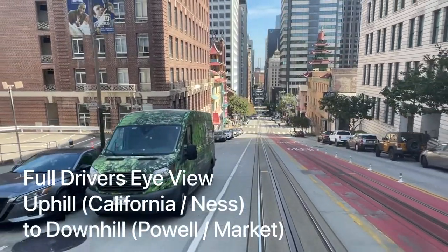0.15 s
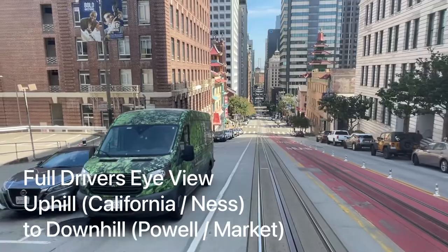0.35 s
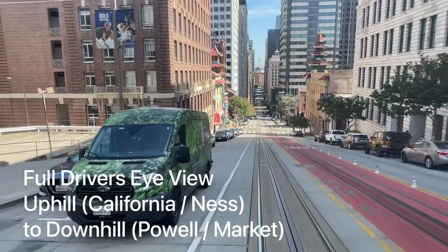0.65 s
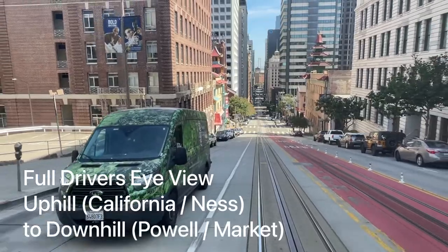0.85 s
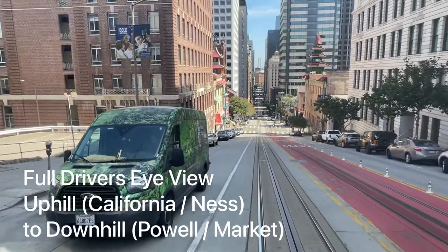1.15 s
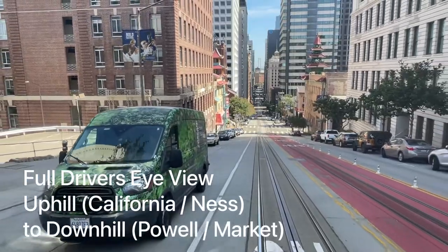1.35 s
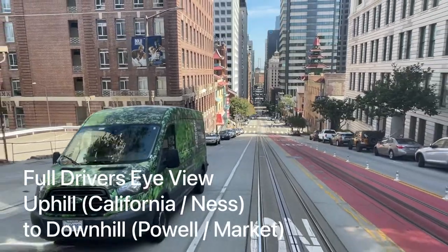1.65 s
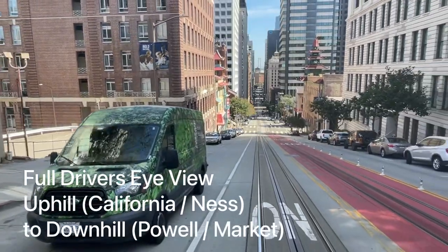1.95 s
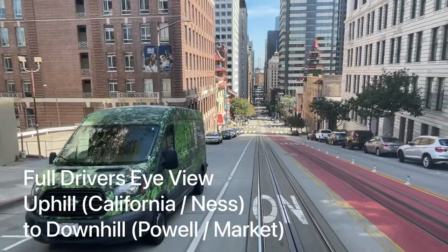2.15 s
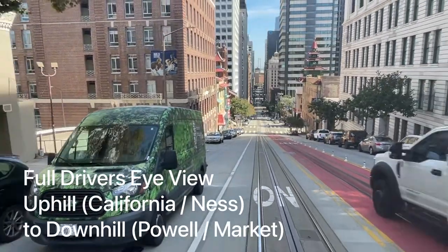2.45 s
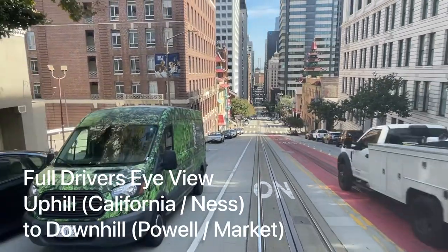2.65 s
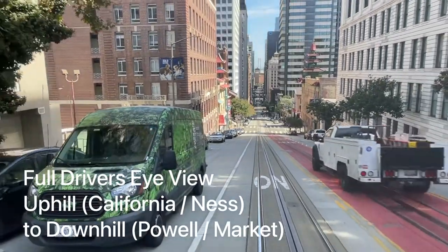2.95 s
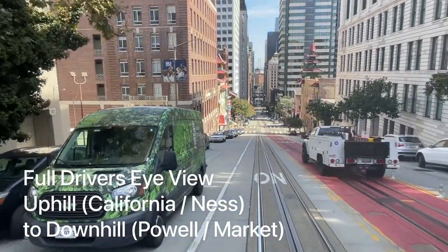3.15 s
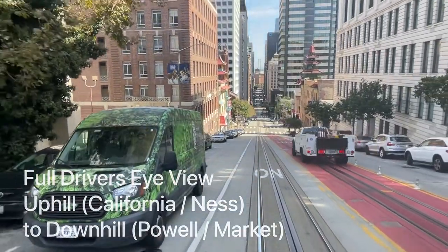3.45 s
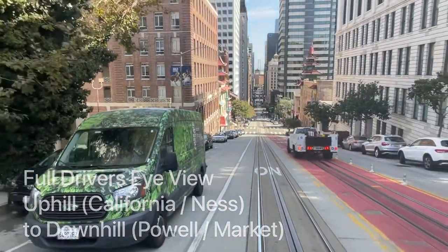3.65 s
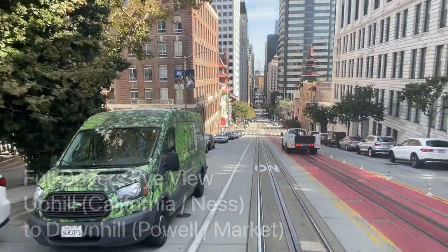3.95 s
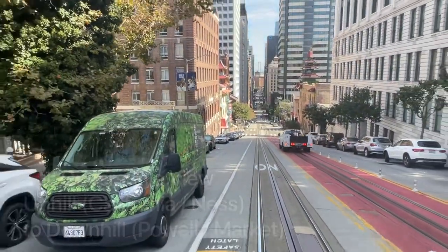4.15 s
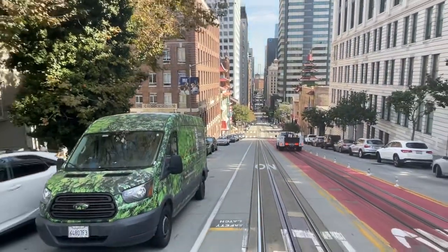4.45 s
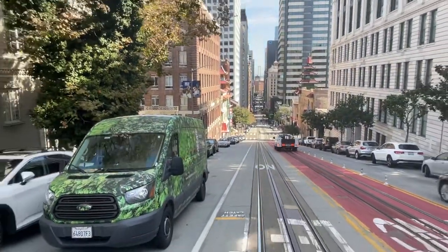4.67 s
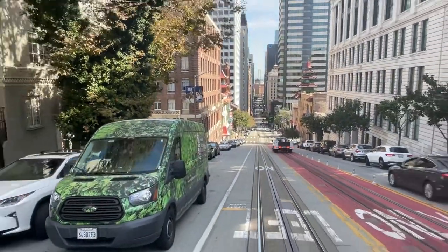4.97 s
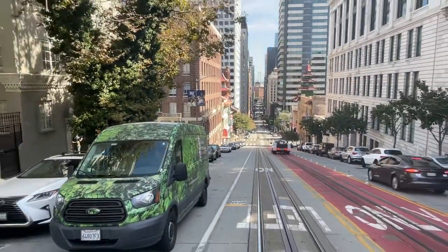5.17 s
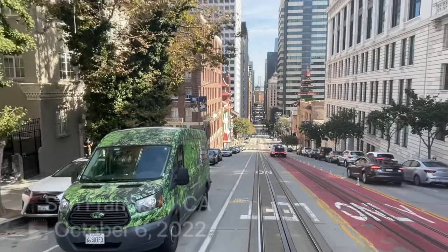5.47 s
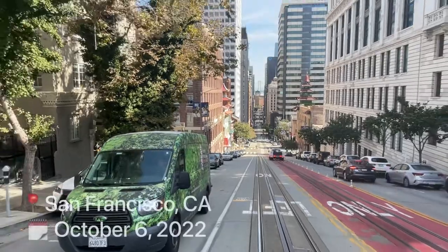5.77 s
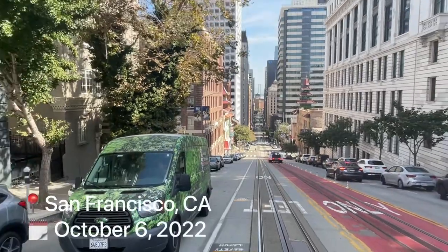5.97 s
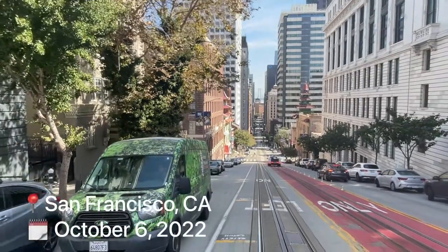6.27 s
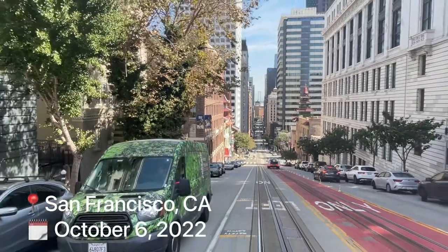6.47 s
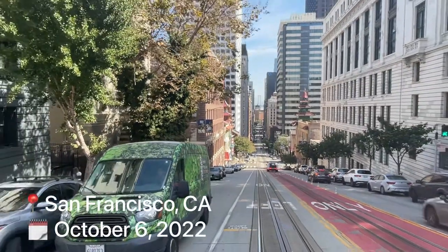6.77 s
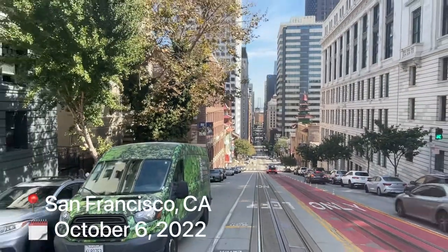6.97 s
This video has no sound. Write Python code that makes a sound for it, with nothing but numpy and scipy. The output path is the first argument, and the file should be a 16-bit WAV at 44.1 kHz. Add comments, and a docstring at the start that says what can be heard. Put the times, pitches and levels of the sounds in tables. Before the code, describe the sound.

Loud low droning and gritty steel rolling from a cable car, with jolts, paired metal clanks, a passing pickup, and a sinking pitch as it brakes.

```python
"""A cable car rolls down a city street, heard from its front platform through two spaced microphones.
Resonances excited by rippled rails make the wheels hum and drone; the drone sinks as the car slows.
Filtered noise gives the wooden body's rumble, the gritty roll and the rattle of loose fittings.
Bursts of small contacts ring the steel in pairs of clanks at the track joints; a brake shoe rubs, chirps
and sings faintly, and a pickup overtakes with a rising sine boom and a hiss of tyre noise."""
import sys
import numpy as np
from scipy import signal
from scipy.fft import rfft, irfft
from scipy.io import wavfile
from scipy.ndimage import uniform_filter1d

SR = 44100
rng = np.random.default_rng(int(sys.argv[2]) if len(sys.argv) > 2 else 0)


def wav_out(sig):
    """Save sig, one row per channel (or a flat mono array), as 16-bit PCM at SR to the path in sys.argv[1]."""
    wavfile.write(sys.argv[1], SR, np.round(np.clip(np.atleast_2d(sig).T, -1, 1) * 32767).astype(np.int16))


N = 313992
TIME = np.arange(N) / SR
BIN_HZ = np.maximum(np.fft.rfftfreq(N, 1 / SR), 1)

# Event levels are relative within a table wherever the layer adds its own gain.
# Car speed through cruise and braking: time_s, speed_share (of cruising speed)
SPEED_CURVE = [(0, 1.032), (2.2, 1.018), (3.6, 1.004), (4.2, 1.056), (5.2, 1.047), (5.5, 0.89), (5.9, .89),
               (6.2, 0.88), (7.12, 0.77)]
# Unevenness of the rail under the wheels: time_s, roughness_db
RAIL_ROUGHNESS = [(0, -1.5), (.66, 1.5), (.95, -2), (1.4, 0), (1.65, -0.5), (2.15, -1.5), (2.5, 0),
                  (2.9, -1.5), (3.3, 0), (3.95, -1.5), (4.25, -4), (4.62, -4.5), (5.17, -8), (5.42, -1),
                  (5.95, 1.5), (6.35, -1.5), (6.85, 0), (7.12, -2.5)]
# How each layer follows speed and rail:
# cruise_db, change_db (per tenth of cruising speed lost), sensitivity (dB per dB of roughness)
DRONE_LEVEL_LAW = (-20, -5, 1.0)
BOOM_LEVEL_LAW = (-28.5, -3.1, 1.5)
RUMBLE_LEVEL_LAW = (-28, -2, 0.9)
ROAR_LEVEL_LAW = (-24, -5, 1.32)
ROLL_LEVEL_LAW = (-32, -5.5, 0.63)
RATTLE_LEVEL_LAW = (-50, -4.5, 0.5)

# Surges of wheel hum over patches of rippled rail: time_s, level_db
HUM_SURGES = [(0.0, -15), (0.06, -26), (0.14, -10), (0.34, -16), (0.63, -11.5), (0.83, -24.5), (0.87, -7.5),
              (0.93, -34), (1.01, -14.5), (1.57, -20.5), (1.61, -13), (1.96, -14), (2.02, -32), (2.08, -7),
              (2.6, -27.5), (2.64, -12), (2.7, -51), (2.74, -20), (2.97, -13), (3.01, -23), (3.33, -15),
              (3.39, -41), (3.41, -20), (3.65, -15), (3.67, -26), (3.86, -14.5), (3.96, -22), (4.26, -10.5),
              (4.44, -19.5), (4.62, -10), (4.72, -15.5), (5.19, -15), (5.37, -25.5), (5.85, -29),
              (5.87, -21), (6.43, -42), (6.88, -38), (7.12, -52)]
# Wandering pitch of the body's boom: time_s, pitch_hz
BOOM_PITCH_CURVE = [(5.3, 147), (5.75, 153), (6.08, 166), (6.4, 153.3), (6.72, 139), (6.88, 151.1)]
# Body groan while the brake is on: start_s, level_db, length_s
BRAKE_GROANS = [(5.25, -25.5, 1.62)]
# Jolts that shake the car: start_s, clatter_db (fittings), length_s, thump_db (body)
CAR_JOLTS = [(0.407, 1.5, 0.055, -2.5), (0.787, 2.5, 0.024, 5), (1.028, -2.5, 0.013, -8),
             (1.181, 1, 0.015, -1.5), (1.29, -4, 0.014, -6), (1.526, 0, 0.021, 5), (1.61, -0.5, 0.013, -14),
             (1.81, -2, 0.075, -13.5), (1.886, 2, 0.048, 2), (1.964, 1, 0.031, -6),
             (2.079, -0.5, 0.027, -17), (2.18, 0, 0.055, -22), (2.34, -8, 0.012, -9),
             (3.092, -4.5, 0.11, -23), (3.214, 2, 0.011, -0.5), (3.447, 4.5, 0.03, -20),
             (3.554, 2, 0.089, 2), (3.722, -21, 0.047, -0.5), (3.912, -1.5, 0.066, 0),
             (4.075, -1.5, 0.017, -9), (5.245, -6.5, 0.083, -3), (6.995, -9.5, .033, -27)]
# Blows and scrapes at the track joints:
# start_s, level_db, rise_s, length_s, crack_pitch_hz, crack_db, treble_db
JOINT_CLANKS = [(2.654, -15.5, 0.018, 0.042, 2650, -2.5, 2), (2.722, -1, 0.003, 0.014, 1933, -2, -6),
                (2.833, -12, 0.013, 0.035, 2520, -1, -12), (4.185, -8.5, 0.014, 0.043, 2670, -7.5, -2.5),
                (4.262, -0.5, 0.018, 0.015, 2310, -9, 1), (4.89, -10.5, 0.018, 0.047, 2670, -8, -1),
                (4.976, -1, 0.0093, 0.018, 2200, -8, -1.5)]
# Wheel striking and chattering on the joint: start_s, level_db
WHEEL_STRIKES = [(2.724, -14), (2.734, -12), (2.749, -19), (4.274, -16), (4.294, -16), (4.987, -10.5),
                 (4.998, -18)]
# Hollow knocks of the wooden frame: start_s, level_db, length_s
FRAME_KNOCKS = [(.245, -20, 0.026), (.61, -19, 0.025), (3.97, -25.5, 0.056)]
# Ticks of a loose steel part: start_s, level_db, length_s, tick_db (dry tick against level_db)
TINK_EVENTS = [(0.6, -50, .006, 0), (1.617, -48, 0.0087, 4), (2.345, -47, .008, 4.5), (3.152, -51, .008, 3),
               (4.416, -35, .004, -15)]
# Brake shoe rubbing on the rail: start_s, level_db, length_s
SHOE_RUBS = [(1.19, -37, .035), (1.295, -37.5, 0.034), (3.455, -31.5, 0.019), (5.81, -47.5, 0.26),
             (6.25, -54.5, .55)]
# Brake shoe chirping: start_s, level_db, length_s, pitch_hz (halfway through)
SHOE_CHIRPS = [(2.445, -4, 0.02, 5100), (2.493, 0, 0.023, 5070), (2.565, -1.5, 0.024, 5100),
               (2.6, -5, 0.073, 5140), (2.85, -13, .1, 5090), (3.31, -12, 0.13, 5070),
               (3.465, 9, 0.004, 5020), (3.543, -5, .012, 5060), (6.74, -24, 0.046, 5210)]
# Brake shoe singing faintly: start_s, level_db, length_s
SHOE_SQUEALS = [(5.5, -70, .8), (6.33, -62.5, .3), (6.68, -64, .15), (6.9, -60, .22)]

# Ringing modes of struck steel: pitch_hz, width_hz, level_db
STEEL_MODES = [(515, 48, 1.5), (606, 7.9, -1), (766, 10, -1), (936, 30, 3.5), (1210, 8.2, -2.5),
               (1370, 13, -7), (1581, 19, 3), (1940, 35, 0), (2230, 37, -3), (2540, 27, -1.5),
               (2756, 12, 4.5), (2935, 34, 0), (3210, 23, -6.5), (3700, 25, -13.5), (4137, 25, -9.5),
               (4300, 14, -12), (5830, 14, -15.5), (6460, 90, -18.5), (7700, 3, -10), (8427, 5, -12.5),
               (9636, 10, -11.5), (10776, 9, -12), (11930, 10, -24)]
# Ringing modes of the loose steel part: pitch_hz, width_hz, level_db
LOOSE_PART_MODES = [(6620, 14, -9), (7483, 10, 0.5), (8350, 13, -1), (9700, 20, -5.5)]
# Ringing modes of the rubbing shoe: pitch_hz, width_hz, level_db
SHOE_MODES = [(1380, 53, -4.5), (1590, 70, -6.5), (1810, 27, 5), (2060, 160, -3.5), (2300, 54, -5.5)]

# Filter colours of the noisy layers, relative levels: pitch_hz, level_db
RUMBLE_FILTER = [(18, -50), (30, -21), (42, -9), (56, 0.5), (95, 2), (118, 1), (138, 3.5), (160, 6.5),
                 (180, -4), (230, -10.5), (320, -68.5)]
ROAR_FILTER = [(170, -3), (240, 10), (290, 4.5), (345, 2), (405, 0.5), (460, 1), (520, -6.5), (640, -44),
               (1000, -61.5)]
ROLL_FILTER = [(350, -11), (540, 6), (730, 7.5), (850, 5.5), (970, 6.5), (1120, 0), (1550, 1.5),
               (1900, -1.5), (2230, -4.5), (2400, -9.5), (2800, -13.5), (3200, -21.5), (5000, -32),
               (12000, -75.5)]
RATTLE_FILTER = [(1200, -8), (2400, 10), (3300, 2), (4400, 3), (5500, 0), (6200, 2), (7400, -9),
                 (9600, -12.5), (11000, -23), (12200, -33.5), (13500, -48)]
JOLT_FILTER = [(300, 11.5), (700, 16.5), (1200, 9), (2200, 8), (3200, -3.5), (5400, -9), (6400, -6.5),
               (7500, -16), (9600, -19), (11000, -28), (13500, -43.5)]
TYRE_FILTER = [(400, -14), (1000, 3), (2200, 0.5), (3300, -17), (6500, -18), (11000, -40.5), (13000, -62)]
CLANK_FILTER = [(250, -6), (480, 8), (900, 2), (1400, -0.5), (2300, -1.5), (3000, -5.5), (3350, -8),
                (4600, -13), (5500, -16), (6600, -15), (7600, -19), (9500, -21.5), (11000, -33),
                (12000, -32.5), (13500, -46.5)]
# Stereo width of diffuse noise: pitch_hz, side_db (side minus mid)
STEREO_WIDTH = [(40, -11.5), (120, -13), (260, -5.5), (420, -5.5), (600, 2.5), (800, 0.5), (1200, 1),
                (1500, 0), (2000, -2), (2500, 1.5), (4200, -2), (5400, 3), (6800, -4), (9000, 4.5),
                (11500, -9)]

HUM_HZ, HUM_SPREAD_HZ = 245.9, 11.7
DRONE_HZ = 210.6  # at cruising speed
# The drone takes this share of each hum surge, counted in dB from the hum's moving average.
SURGE_SHARE, SURGE_AVERAGE_S = 0.36, 0.45
KNOCK_HZ = 402.7
CHIRP_GLIDE_HZ_PER_S = 1000
SQUEAL_HZ, SQUEAL_SPLIT_HZ = 3390, 38  # lower of two close shoe modes, and the gap between them
PICKUP_S, PICKUP_LENGTH_S, PICKUP_DB = 2.07, 0.29, -23  # exhaust boom as it draws level
PICKUP_HZ, PICKUP_CLIMB_HZ_PER_S = 74.1, 11
NEAREST_S, HISS_FALL_S, HISS_DB = 2.7, 0.31, -35  # tyres nearest, time to fall 3 dB, peak level
MIC_LAG_S = 0.00046  # travel time of sound between the two microphones
LOW_CUT_HZ, TOP_HZ = 32, 13000


def undb(db):
    """Decibels to gain."""
    return 10 ** (np.asarray(db) / 20)


def unit(x):
    """Scale a stereo pair so that its centre has rms 1."""
    return x / np.sqrt(np.mean(x.mean(0) ** 2))


def curve(table):
    """Join a table's timed points by straight lines."""
    s, values = np.transpose(table)
    return np.interp(TIME, s, values)


def gains(points):
    """Gain at every frequency, in straight lines over log pitch and dB."""
    hz, db = np.transpose(points)
    return undb(np.interp(np.log(BIN_HZ), np.log(hz), db))


def shape(x, response):
    """Filter by a frequency response."""
    return irfft(rfft(x) * response, N)


def walk(rate):
    """Slow chance with spread 1, changing about rate times a second."""
    response = np.exp(-.5 * (BIN_HZ / rate) ** 2)
    response[0] = 0  # no constant offset
    x = shape(rng.standard_normal(N), response)
    return x / x.std()


def diffuse():
    """Noise from all round: the bass much alike in both microphones, the treble less so."""
    mid, side = rng.standard_normal((2, N))
    side = shape(side, gains(STEREO_WIDTH))
    return np.array([mid + side, mid - side])


def sided(near_db):
    """Diffuse noise plus a share from the nearest wheels, which reaches the right microphone late."""
    lag = int(MIC_LAG_S * SR)
    direct = rng.standard_normal(N)
    return diffuse() + undb(near_db) * np.array([direct, np.roll(direct, lag)])


def grains(rate, spread_db):
    """Force of many tiny contacts of unequal size, each decaying over a millisecond; rms 1."""
    sizes = undb(spread_db * np.minimum(rng.standard_normal(N), 2))
    hits = (rng.random(N) < rate / SR) * sizes
    force = signal.lfilter([1], [1, -np.exp(-1 / (.001 * SR))], hits)
    return force / np.sqrt(np.mean(force ** 2))


def blows(table, rise_s, fall_s, tail_db, tail_s):
    """Envelope of blows: each grinds for its contact length, drops, and lingers in the cabin."""
    power = np.zeros(N)
    for s, db, length in table:
        age = np.maximum(TIME - s, 0)
        after = np.maximum(age - length, 0)
        drop = np.exp(-np.minimum(after / fall_s, 20))
        tail = undb(tail_db) * np.exp(-after / tail_s)
        power += (undb(db) * np.minimum(age / rise_s, 1) * (drop + tail)) ** 2
    return np.sqrt(power)


def tone(hz, spread_hz, steady, lead_rad, side_db):
    """A randomly driven resonance; steady (0-1) evens out its beating, and the left leads by lead_rad."""
    drive, scatter = ((walk(spread_hz) + 1j * walk(spread_hz)) / np.sqrt(2) for _ in range(2))
    mid = drive / (np.abs(drive) + 0.42) ** np.clip(steady, 0, 1)
    mid = mid / mid.std()
    side = 1j * np.tan(lead_rad / 2) * mid + undb(side_db) * scatter
    carrier = np.exp(2j * np.pi * np.cumsum(hz * np.ones(N)) / SR)
    return np.sqrt(2) * (np.array([mid + side, mid - side]) * carrier).real


def modal(x, modes):
    """Ring a table of modes; neighbours swing in opposite senses."""
    response = 0
    for k, (hz, width, db) in enumerate(modes):
        resonance = hz * width / (hz ** 2 - BIN_HZ ** 2 + 1j * BIN_HZ * width)
        response = response + (-1) ** k * undb(db) * resonance
    return shape(x, response)


def panels(x, share, ring_s):
    """Wood and glass all round add a dense, short ring, which ripples the spectrum."""
    ring = rng.standard_normal(N) * np.exp(-np.minimum(TIME / ring_s, 20))
    return shape(x, 1 + share * rfft(ring) / np.sqrt(np.sum(ring ** 2)))


def flicker(x, depth_db, rate, count=7):
    """Let half-octave bands around 600 Hz and up swell and fade independently, shifting the colour."""
    place = np.clip(2 * np.log2(BIN_HZ / 600), 0, count - 1)
    spectrum = rfft(x)
    total = 0
    for k in range(count):
        band = irfft(spectrum * np.maximum(1 - np.abs(place - k), 0), N)
        total = total + band * undb(depth_db * walk(rate))
    return total


def driven(law, rail_db):
    """Level in dB of a layer that grows with speed and with the unevenness of the rail."""
    cruise_db, slowing_db, sensitivity = law
    return cruise_db + slowing_db * 10 * (1 - curve(SPEED_CURVE)) + sensitivity * rail_db


def wheels():
    """Rail ripple drives beating resonances: hum, speed-following drone, boom and a groan under braking."""
    rough_db = curve(RAIL_ROUGHNESS)
    hum_db = curve(HUM_SURGES)
    boom_hz = curve(BOOM_PITCH_CURVE)
    hum = undb(hum_db) * tone(HUM_HZ, HUM_SPREAD_HZ, steady=0.43, lead_rad=0.25, side_db=-20.5)

    surge_db = hum_db - uniform_filter1d(hum_db, int(SURGE_AVERAGE_S * SR))
    drone_db = driven(DRONE_LEVEL_LAW, rough_db) + SURGE_SHARE * surge_db
    drone_hz = DRONE_HZ * curve(SPEED_CURVE)
    drone = undb(drone_db) * tone(drone_hz, spread_hz=16.9, steady=0.047, lead_rad=0.57, side_db=-13)

    boom_gain = undb(driven(BOOM_LEVEL_LAW, rough_db))
    boom = boom_gain * tone(boom_hz, spread_hz=14.0, steady=0.23, lead_rad=.25, side_db=-14.5)
    braking = blows(BRAKE_GROANS, rise_s=0.98, fall_s=0.053, tail_db=-32, tail_s=.3)
    groan = braking * tone(boom_hz, spread_hz=12, steady=0.22, lead_rad=.25, side_db=-11)
    return hum + drone + boom + groan


def body():
    """The wooden car rumbles on its springs and thumps at jolts and joints; the wheels add a low roar."""
    rough_db = curve(RAIL_ROUGHNESS)
    thumps = [(s, thump_db, length) for s, _, length, thump_db in CAR_JOLTS]
    jolts = blows(thumps, rise_s=0.018, fall_s=0.084, tail_db=-14.0, tail_s=0.27)
    joint_blows = [(s, db, length) for s, db, _, length, *_ in JOINT_CLANKS]
    knocks = blows(joint_blows, rise_s=0.0037, fall_s=0.013, tail_db=-20.0, tail_s=.08)
    steady_sway = undb(driven(RUMBLE_LEVEL_LAW, rough_db))
    sway = np.sqrt(steady_sway ** 2 + (undb(-21.0) * jolts) ** 2 + (undb(-21.0) * knocks) ** 2)
    rumble = unit(shape(diffuse(), gains(RUMBLE_FILTER))) * sway

    # a loose overtone just under the octave of the drone
    overtone_hz = 1.9 * DRONE_HZ * curve(SPEED_CURVE)
    overtone = tone(overtone_hz, spread_hz=16.0, steady=0.025, lead_rad=.6, side_db=-6.0)
    roar = undb(2.5) * unit(shape(diffuse(), gains(ROAR_FILTER))) + undb(-6.0) * overtone
    rumble = rumble * undb(np.array([[-.8], [.8]]))  # leans right
    return rumble + roar * undb(driven(ROAR_LEVEL_LAW, rough_db))


def rolling():
    """Gritty steel contact, a faint ring of the lower wheel modes, and a fine rattle; all shake together."""
    rough_db = curve(RAIL_ROUGHNESS)
    shake = walk(9.9)
    contact = sided(near_db=-2.0) * (5.5 + 1.5 * grains(rate=130, spread_db=5))
    grit = panels(shape(contact, gains(ROLL_FILTER)), share=0.54, ring_s=0.008)
    grit = unit(flicker(grit, depth_db=2.23, rate=8.8))
    low_noise = shape(diffuse(), 1 / (1 + (BIN_HZ / 2800) ** 4))
    ring = unit(modal(low_noise, STEEL_MODES)) * undb(3.3 * walk(5))
    roll = grit + undb(-15.5) * ring

    chatter = sided(near_db=-9.5) * (3.0 + 0.78 * grains(rate=160, spread_db=3.5))
    rattle = unit(panels(shape(chatter, gains(RATTLE_FILTER)), share=0.93, ring_s=0.0081))
    roll_gain = undb(driven(ROLL_LEVEL_LAW, rough_db) + 0.89 * shake)
    rattle_gain = undb(driven(RATTLE_LEVEL_LAW, rough_db) + 0.98 * shake)
    return roll * roll_gain + rattle * rattle_gain


def frame():
    """The wooden frame gives a few hollow knocks at one resonance."""
    envelope = blows(FRAME_KNOCKS, rise_s=0.0088, fall_s=0.016, tail_db=-11.5, tail_s=.06)
    return envelope * tone(KNOCK_HZ, spread_hz=18, steady=0.46, lead_rad=.6, side_db=-9.0)


def fittings():
    """Each jolt sets off a short chatter of loose parts."""
    clatters = [(s, clatter_db, length) for s, clatter_db, length, _ in CAR_JOLTS]
    shaken = blows(clatters, rise_s=0.012, fall_s=0.053, tail_db=-15.0, tail_s=0.051)
    force = shaken * (1.5 + 0.11 * grains(rate=200, spread_db=4.5))
    return undb(-35.5) * force * unit(shape(sided(near_db=-8.5), gains(JOLT_FILTER)))


def tinks():
    """A loose steel part ticks in a broad band and rings thinly in its narrow modes."""
    contact = unit(sided(near_db=-5.5))
    touches = [row[:3] for row in TINK_EVENTS]
    touch = blows(touches, rise_s=.004, fall_s=.008, tail_db=-20, tail_s=.04)
    ticks = [(s, db + tick_db, length) for s, db, length, tick_db in TINK_EVENTS]
    tick = blows(ticks, rise_s=.005, fall_s=.01, tail_db=-16, tail_s=.04)
    broad = [(8800, 5000, 0)]
    dry_tick = modal(modal(tick * contact, broad), broad)  # twice, for steeper skirts
    return dry_tick + undb(15) * modal(touch * contact, LOOSE_PART_MODES)


def rubbing():
    """The shoe sticks and slips on the rail, rasping in its own resonances."""
    rasp = sided(near_db=-2.5) * (1.0 + grains(rate=190, spread_db=5))
    rubs = blows(SHOE_RUBS, rise_s=0.019, fall_s=0.022, tail_db=-20.5, tail_s=.12)
    return unit(modal(rasp, SHOE_MODES)) * rubs


def pickup():
    """An exhaust boom rises as the truck draws level on the right; its tyres hiss as it pulls ahead."""
    hz = PICKUP_HZ + PICKUP_CLIMB_HZ_PER_S * np.clip(TIME - PICKUP_S, 0, .5)
    passing = [(PICKUP_S, PICKUP_DB, PICKUP_LENGTH_S)]
    swell = blows(passing, rise_s=0.037, fall_s=0.056, tail_db=-31.5, tail_s=.2)
    exhaust = np.sqrt(2) * np.sin(2 * np.pi * np.cumsum(hz) / SR)
    boom = exhaust * swell * undb(0.99 * walk(12))
    nearness = 1 / np.hypot(1, (TIME - NEAREST_S) / HISS_FALL_S)
    tyres = undb(HISS_DB) * nearness * unit(shape(diffuse(), gains(TYRE_FILTER)))
    return (boom + tyres) * undb(np.array([[-1.0], [1.0]]))


def brake():
    """The shoe chirps in a quick flutter, gliding up as it bites, and sings at two close lower modes."""
    chirp_rows = [row[:3] for row in SHOE_CHIRPS]
    grip = blows(chirp_rows, rise_s=0.005, fall_s=0.007, tail_db=-15, tail_s=0.11)
    pitch = np.full(N, float(SHOE_CHIRPS[0][3]))
    for s, _, length, hz in SHOE_CHIRPS:
        glide = CHIRP_GLIDE_HZ_PER_S * (np.minimum(TIME - s, length) - length / 2)
        pitch = np.where(TIME < s, pitch, hz + glide)
    flutter = undb(-43.0 + 2.8 * walk(70))
    chirps = flutter * grip * tone(pitch, spread_hz=65, steady=.2, lead_rad=.6, side_db=-6)

    drag = blows(SHOE_SQUEALS, rise_s=.06, fall_s=.04, tail_db=-20, tail_s=.15)
    twins = 0
    for hz in (SQUEAL_HZ, SQUEAL_HZ + SQUEAL_SPLIT_HZ):
        twins = twins + tone(hz, spread_hz=26, steady=0.25, lead_rad=.3, side_db=-5.0)
    return chirps + drag * unit(twins)


def joints():
    """Grinding and hard knocks: small contacts and sharp strikes crash, crack and leave the steel ringing."""
    contact = unit(sided(near_db=-7.5) * (3.5 + 0.84 * grains(rate=330, spread_db=6.5)))
    struck, crack = 0, 0
    for s, db, rise, length, hz, crack_db, treble_db in JOINT_CLANKS:
        blow = contact * blows([(s, db, length)], rise_s=rise, fall_s=0.015, tail_db=-11.5, tail_s=0.089)
        dull = signal.lfilter(*signal.butter(1, 3500, fs=SR), blow)
        struck = struck + dull + undb(treble_db) * (blow - dull)
        # two resonant passes narrow the crack to its pitch
        ringing = signal.lfilter(*signal.iirpeak(hz, 7.0, fs=SR), blow)
        ringing = signal.lfilter(*signal.iirpeak(hz, 5.0, fs=SR), ringing)
        crack = crack + undb(crack_db) * ringing
    strikes = [(s, db, .0004) for s, db in WHEEL_STRIKES]
    snaps = blows(strikes, rise_s=0.00036, fall_s=0.0004, tail_db=-22, tail_s=0.0033)
    struck = struck + undb(13.5) * snaps * unit(sided(near_db=3.5))
    crash = panels(shape(struck, gains(CLANK_FILTER)), share=0.77, ring_s=0.0084)
    return undb(-9.0) * crash + crack + undb(-8.5) * modal(struck, STEEL_MODES)


def scene():
    """Everything heard from the platform, slightly louder on the right."""
    car = wheels() + body() + frame() + rolling() + fittings() + joints() + brake() + rubbing() + tinks()
    return (car + pickup()) * undb(np.array([[-.3], [.3]]))


def record(dry):
    """Drop the deepest bass, round the highest peaks just under full scale and cut the top."""
    lean = shape(dry, 1 / np.sqrt(1 + (LOW_CUT_HZ / BIN_HZ) ** 8))
    rounded = lean / (1 + (lean / .92) ** 8) ** (1 / 8)
    top_cut = signal.ellip(8, .2, 70, TOP_HZ, fs=SR, output="sos")
    return signal.sosfilt(top_cut, rounded)


dry = scene()
out = record(dry)
wav_out(out)
```